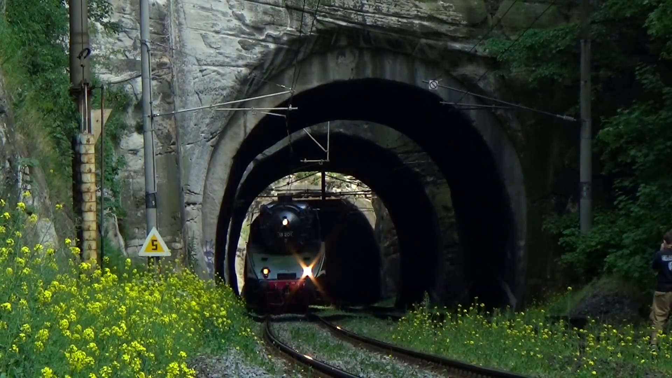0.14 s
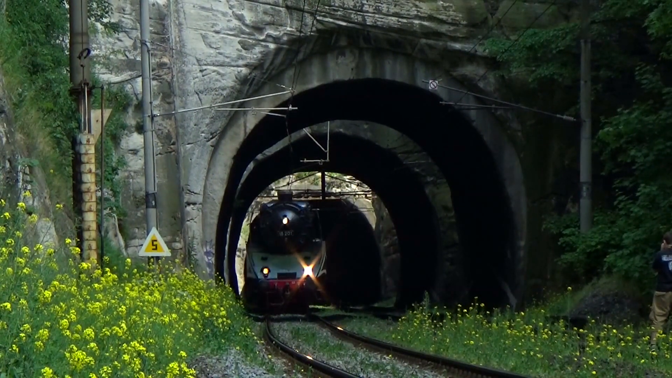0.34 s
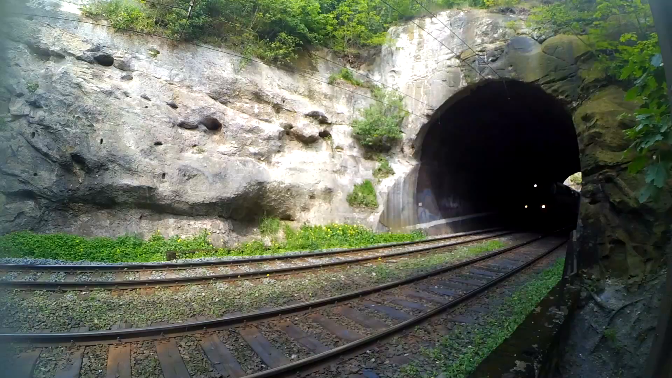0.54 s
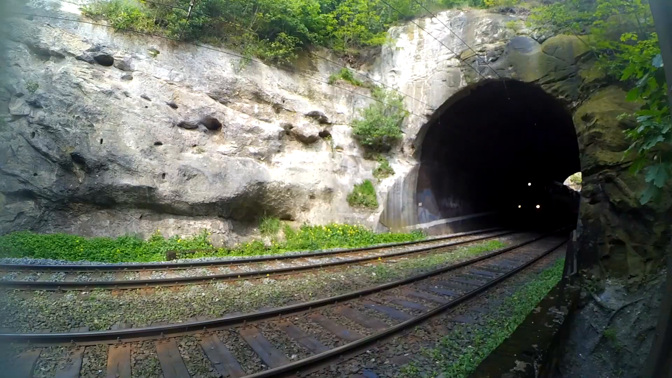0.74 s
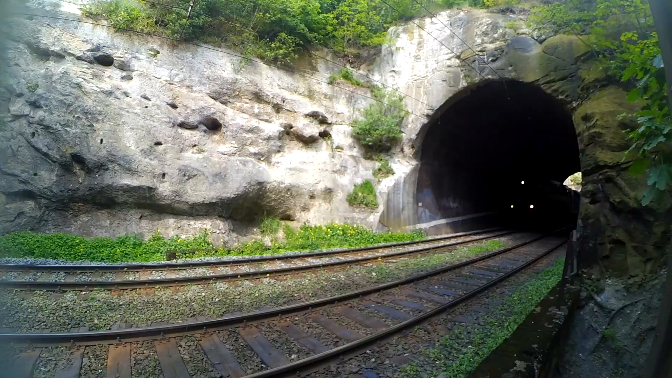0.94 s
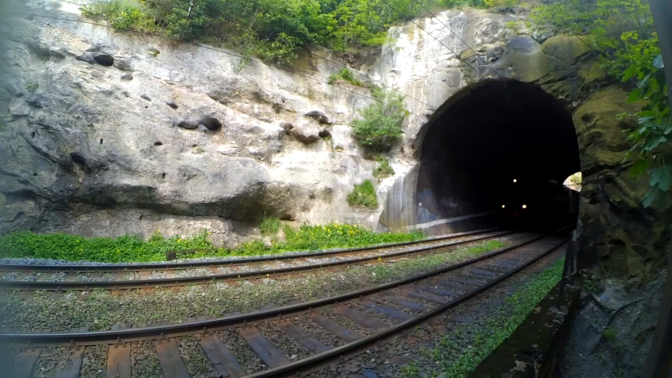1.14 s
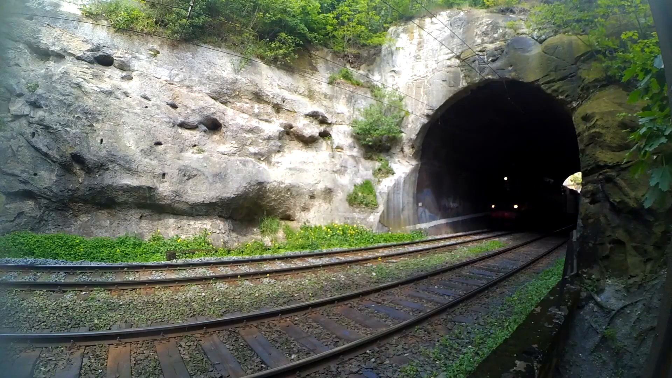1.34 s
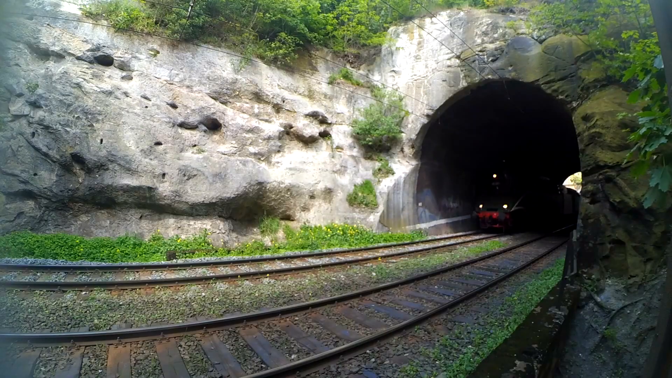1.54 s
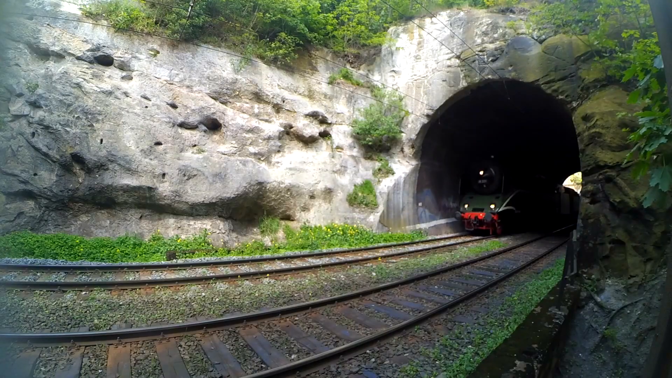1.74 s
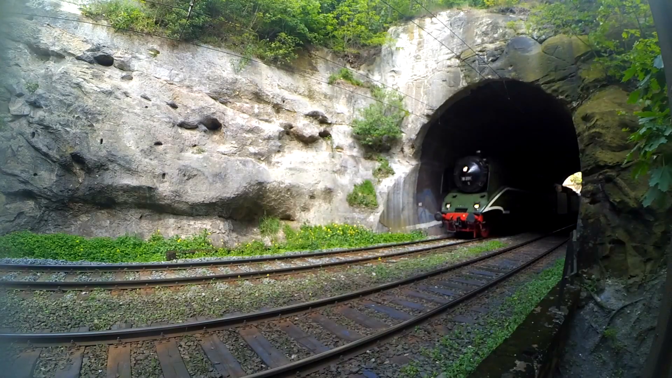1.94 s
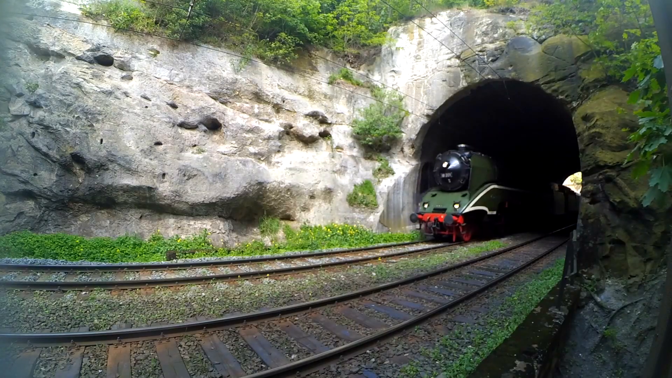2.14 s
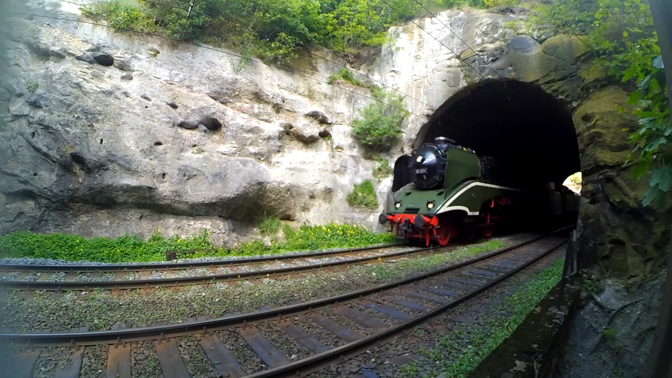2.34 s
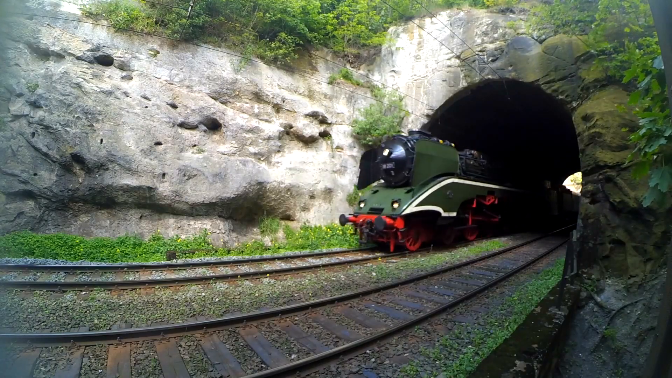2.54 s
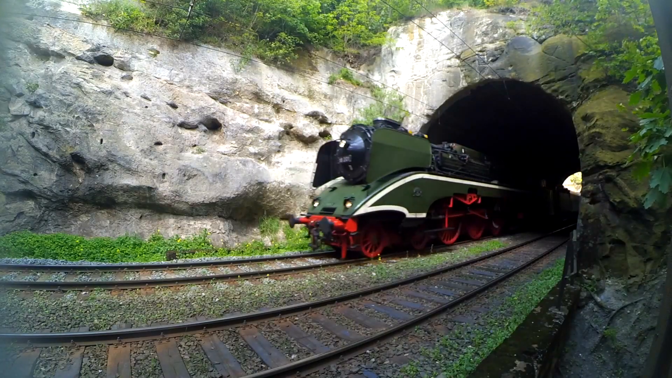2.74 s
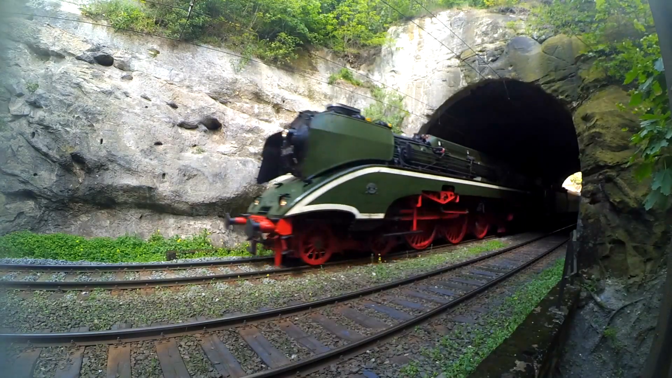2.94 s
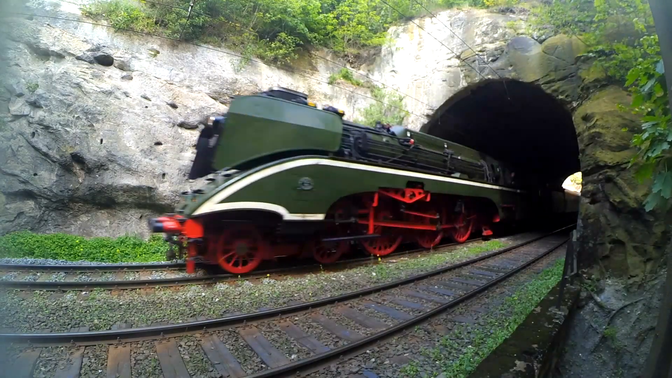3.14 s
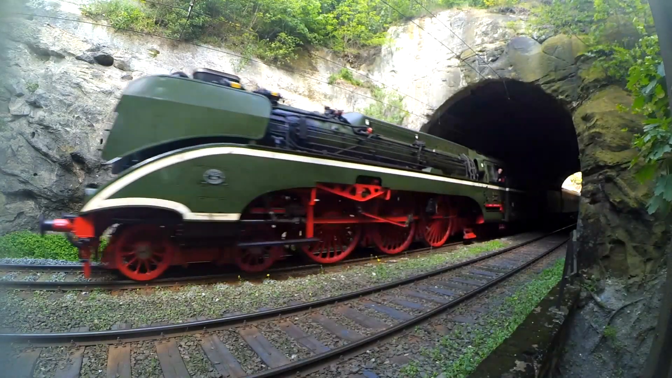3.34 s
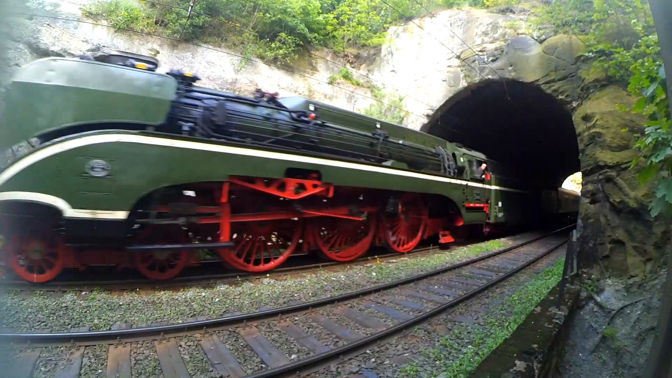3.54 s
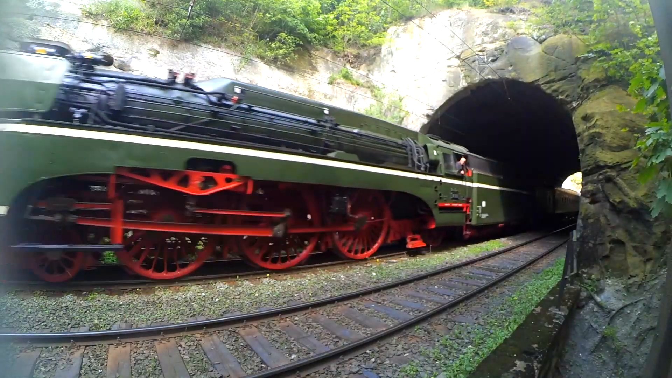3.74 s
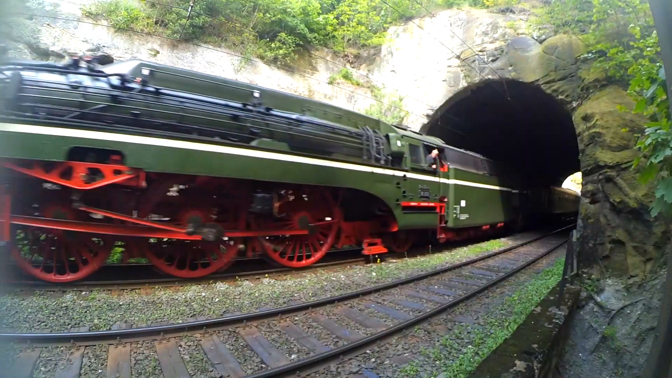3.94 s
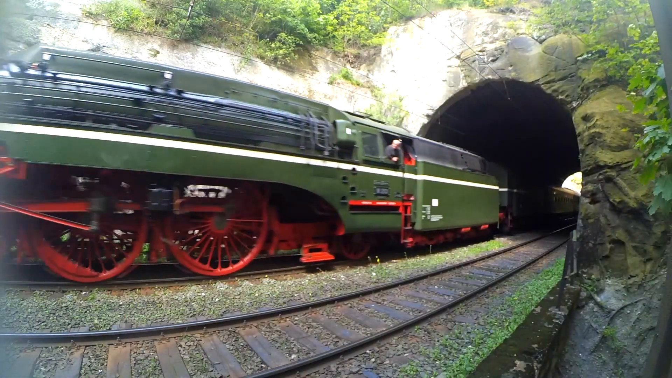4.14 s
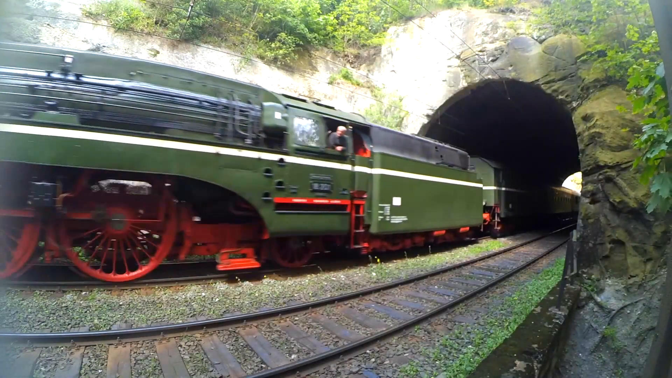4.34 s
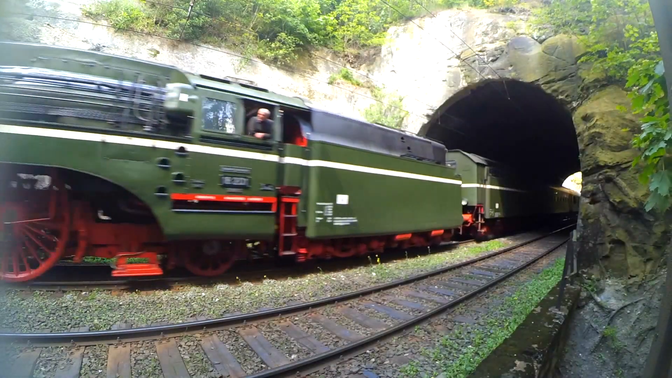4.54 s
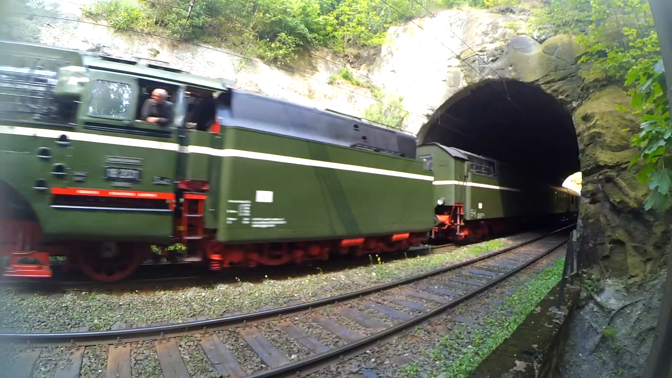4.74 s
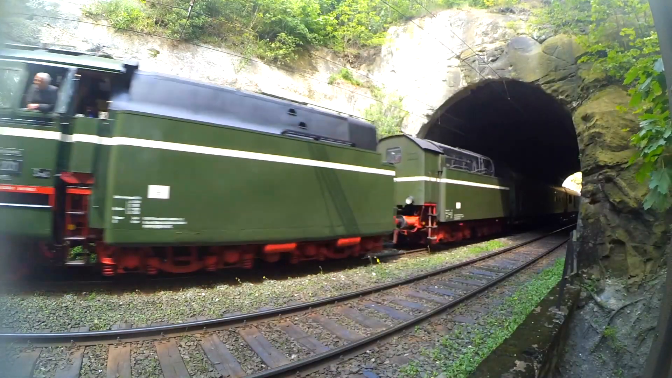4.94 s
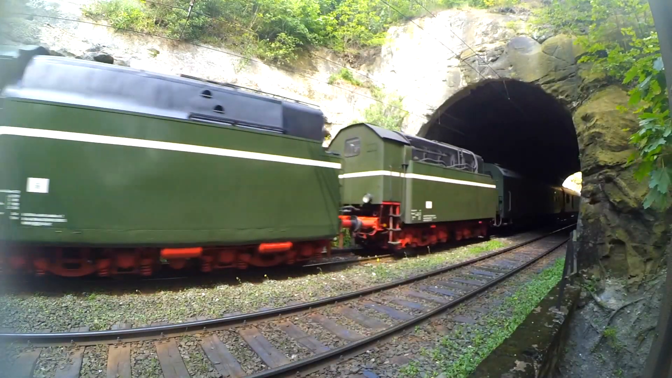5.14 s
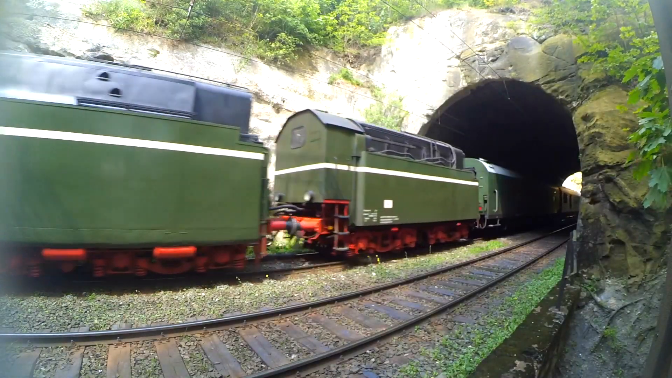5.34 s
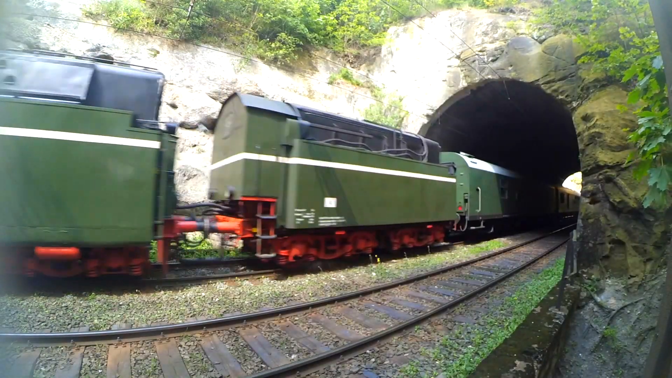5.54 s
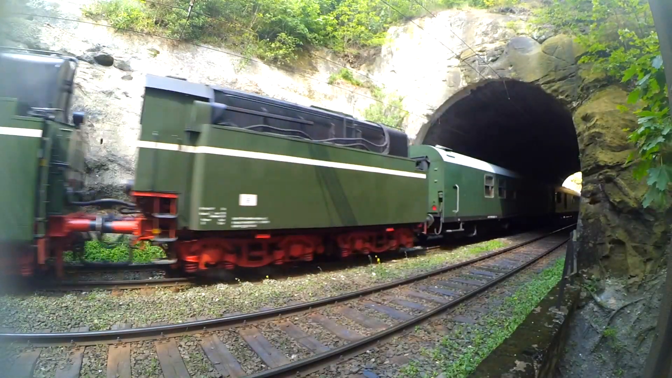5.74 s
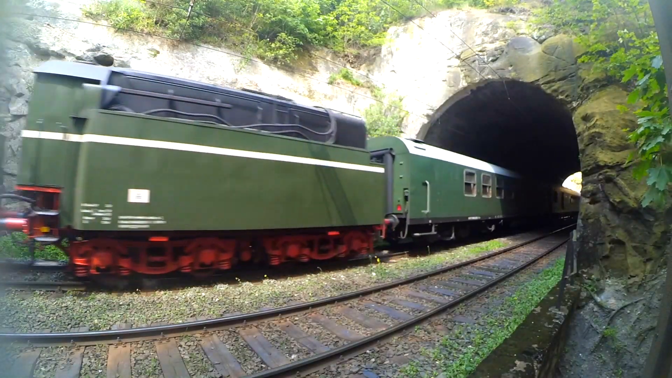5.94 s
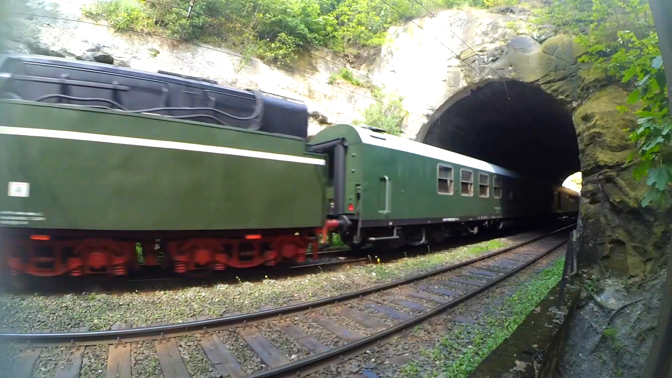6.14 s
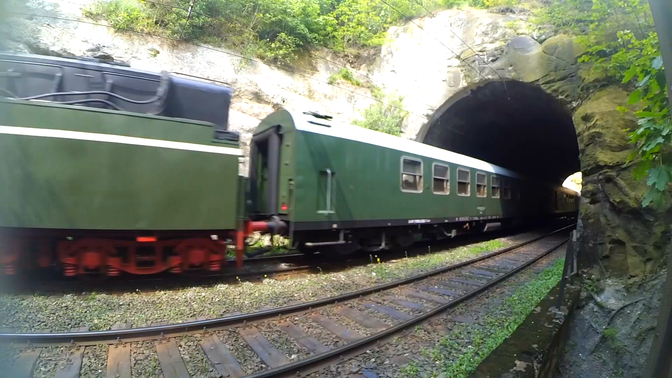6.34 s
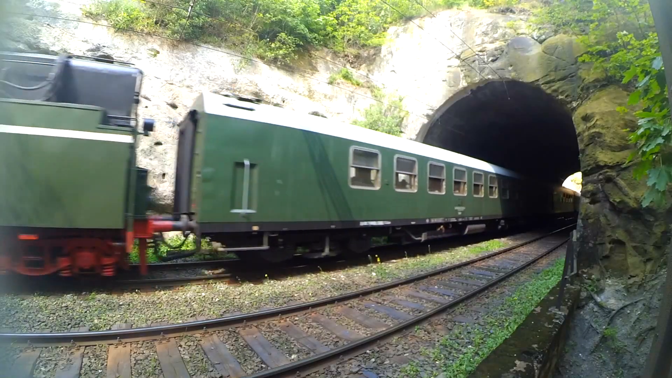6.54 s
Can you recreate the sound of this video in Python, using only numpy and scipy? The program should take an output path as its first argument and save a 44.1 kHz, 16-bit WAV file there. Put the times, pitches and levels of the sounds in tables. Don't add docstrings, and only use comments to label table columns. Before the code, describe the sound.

For the first 0.5 seconds a smooth distant train roar sits under thin, falling bird chirps. It cuts abruptly to a close trackside microphone by a rock tunnel: quieter low hum, gentle steam hiss and breathy puffs from about 0.9 to 1.7 seconds, with clear bird whistles near 0.7, 1.2 and 1.8 and a high cricket rasping about six times a second. Singing rails and rumble grow from 2 seconds. At 2.8 the engine leaves the tunnel and the bass opens into uneven deep booms. Steam bursts at 3.3 and sharply at 4.2, with a metallic ping and faint high squeaks. Loose rattling knocks begin around 3.5, return in clusters, and become a dense, hard clatter from 5.3 to 5.9, loudest near 5.6. Then knocks soften and thin while booming, wheel rumble and hiss continue to 6.6 seconds without stopping.

```python
import sys
import numpy as np
from scipy import signal
from scipy.io import wavfile
from scipy.ndimage import uniform_filter1d

SR = 44100
rng = np.random.default_rng(int(sys.argv[2]) if len(sys.argv) > 2 else 0)


def voltage_ratio(level):
    return 10 ** (np.asarray(level, float) / 20)


def generate_wav(sig):
    pcm = np.round(np.clip(np.atleast_2d(sig).T, -1, 1) * 32767).astype(np.int16)
    wavfile.write(sys.argv[1], SR, pcm)


N = 291060
T = np.arange(N) / SR
CUT_S = .475

# pitch_hz, wander_hz
AIR_MODES = [
    (52.5, 3.5),
    (78.55, .5),
    (101, 3.5),
]
# pitch_hz, width_hz, level_db
HOUSING_MODES = [(989, 18, 7.5), (1080, 40, -11), (1344, 394, 9), (1662, 550, -11), (1929, 170, 8),
                 (2330, 38, 3), (2525, 260, -9), (2703, 410, 7), (2740, 51, 2), (3820, 310, 3),
                 (3860, 61, 5), (4160, 490, 1.5), (4736, 180, 6), (5220, 350, 5.5), (5820, 580, -3.5),
                 (6800, 220, 6), (8940, 250, 2.5), (10700, 510, 2)]


def evened(x):
    return x / np.sqrt(np.mean(x ** 2) + 1e-20)


def read(points, hz):
    f, value = np.transpose(points)
    return np.interp(np.log(hz + 1), np.log(f + 1), value, left=-100, right=-100)


def bumps(modes, hz):
    return sum(db / (1 + (2 * (hz - f) / width) ** 2) for f, width, db in modes)


def slow(rate_hz):
    size = max(int(SR / rate_hz / 2), 3)
    return evened(uniform_filter1d(uniform_filter1d(rng.standard_normal(N), size), size))


def noise(spectrum, modes, band, patchy_db, flicker_db, size):
    frames, hz = 4 * N // size + 5, np.fft.rfftfreq(size, 1 / SR)
    a, b, patches = rng.standard_normal((frames, len(hz), 3)).T
    patches = uniform_filter1d(patches, size // 64, 0)
    patches = evened(uniform_filter1d(patches, 12000 // size + 2, 1))
    flicker = evened(uniform_filter1d(rng.standard_normal(frames), 6000 // size + 2))
    shape = voltage_ratio(read(spectrum, hz) + bumps(modes, hz))
    inside = (hz > band[0]) & (hz < band[1])
    share = np.sum(shape[inside] ** 2) / np.sum(shape ** 2)
    z = (a + 1j * b) * shape[:, None] * voltage_ratio(patchy_db * patches + flicker_db * flicker)
    return evened(signal.istft(z, nperseg=size, noverlap=3 * size // 4)[1][:N]) / np.sqrt(share)


def nearness():
    # time_s, level_db
    approach = [(0.48, -15), (0.75, -12.5), (1.2, -12), (1.84, -11.5), (2.3, -10), (2.7, -7.5), (3.0, -3.5),
                (3.25, -2.5), (3.36, -1.5), (3.6, 0.5), (4.4, 1), (5.2, 2), (5.8, 3.5), (6.6, 1.5)]
    return np.interp(T, *np.transpose(approach))


def surges(rows):
    return sum((voltage_ratio(db) * np.cos(np.pi * np.clip((T - s) / length, -.5, .5))) ** 2 for s, db, length in rows)


def distant_roar():
    # pitch_hz, level_db per Hz
    roar = [(15, -44.5), (25, -12), (53, -4), (152, -16), (253, -2), (848, -3.5), (2010, -9.5),
            (2420, -8.5), (3530, -18), (4740, -19.5), (6730, -25), (9040, -27), (15500, -34.5)]
    middle = noise(roar, [(50, 40, 9), (95, 30, -6)], (20, 16000), .3, .2, size=2048)
    side_modes = [(200, 400, -15), (8800, 500, 12), (7000, 6000, -3)]
    side = voltage_ratio(-27.0) * noise(roar, side_modes, (20, 16000), 3.3, .4, size=1024)
    return voltage_ratio(-51) * np.array([middle + side, middle - side])


def cricket():
    chirps = [.609, .751, .92, 1.068, 1.237, 1.4, 1.557, 1.728, 1.931, 2.144, 2.351, 2.516, 2.668, 2.927,
              2.988, 3.135, 3.262, 3.457, 3.627, 3.809, 3.955, 4.118, 4.277, 4.449, 4.585, 4.757, 4.908,
              5.091, 5.236, 5.416, 5.576, 5.735, 5.889, 6.06, 6.242, 6.451]
    chirp_s = .04
    wing = [(10500, -14), (10700, -1), (11000, 0), (11350, -4), (11600, -16)]  # pitch_hz, level_db per Hz
    rasp = noise(wing, [], (9000, 13000), 1., 1., size=512)
    levels_db = -74.5 + 1.1 * rng.standard_normal(len(chirps))
    shape = sum(voltage_ratio(db) * np.clip((chirp_s / 2 - abs(T - s)) / .008, 0, 1) for s, db in zip(chirps, levels_db))
    return shape * rasp


def birds_and_squeaks():
    # start_s, length_s, first_hz, last_hz, level_db
    bird_rows = [(0.25, 0.068, 5050, 4560, -66), (0.262, 0.05, 5450, 4750, -70),
                 (0.3, 0.045, 4600, 5000, -63.5), (0.335, 0.085, 4850, 4620, -66.5),
                 (0.42, 0.025, 4800, 4750, -67), (0.474, 0.045, 3680, 3600, -67),
                 (0.474, .07, 2700, 2900, -61), (.542, .07, 2950, 3170, -60.5), (.82, .05, 5120, 5150, -68),
                 (1.31, .05, 5060, 5120, -62), (1.91, .06, 5150, 5150, -66), (1.99, .06, 6250, 6230, -67),
                 (0.693, 0.14, 5240, 5030, -57), (1.212, .12, 5180, 5030, -56),
                 (1.786, 0.075, 5080, 5020, -58), (1.848, .065, 5020, 5060, -57.5),
                 (2.8, .11, 5200, 5180, -67), (3.04, .07, 5280, 5100, -68), (1.987, .07, 6700, 6750, -66),
                 (2.078, 0.06, 3930, 3960, -60.5)]
    # start_s, length_s, pitch_hz, level_db, unsteadiness_hz
    squeak_rows = [
        (.20, .05, 8900, -76, 500),
        (2.38, .04, 10650, -80, 60),
        (2.55, .05, 10600, -80, 60),
        (2.80, .05, 10300, -78, 200),
        (4.15, .06, 14170, -81, 60),
        (4.37, .4, 8000, -72, 120),
        (4.37, .12, 14330, -80, 50),
        (4.385, .1, 12480, -80, 50),
        (4.61, .03, 14050, -82, 150),
        (6.20, .18, 13550, -80, 250),
    ]
    whistles = []
    for i, (s, length, first_hz, last_hz, db) in enumerate(bird_rows):
        fade_db = -14 * (s > .29)
        whistles.append((s, s + length, first_hz, last_hz, db, db + fade_db, 25. if i < 6 else 15.))
    for s, length, hz, db, unsteady_hz in squeak_rows:
        whistles.append((s, s + length, hz, hz, db, db, unsteady_hz))

    out, waver = np.zeros(N), slow(98.0)
    for start, end, first_hz, last_hz, first_db, last_db, unsteady_hz in whistles:
        on = slice(round(start * SR), round(end * SR))
        hz = np.interp(T[on], [start, end], [first_hz, last_hz])
        level_db = np.interp(T[on], [start, end], [first_db, last_db]) + 4.5
        turns = np.cumsum(hz + unsteady_hz * waver[on]) / SR
        out[on] += voltage_ratio(level_db) * np.sin(2 * np.pi * turns) * signal.windows.tukey(len(turns), .6)
    t = np.arange(8000) / SR
    tail = rng.standard_normal(len(t)) * voltage_ratio(-60 * t / .4)
    return out + voltage_ratio(-6.0) * signal.oaconvolve(out, tail / np.linalg.norm(tail))[:N]


def rail():
    # pitch_hz, width_hz
    tones = [
        (264, 12),
        (995, 65),
    ]
    tone_db = [-60.5, -61]
    shares = [1.5, 0.99]
    fades_db = [-2.5, -10]
    # centre_s, level_db, length_s
    low_rows = [
        (1.243, -64, .14),
        (1.482, -61, 0.19),
        (1.88, -63, 0.31),
        (2.128, -57.5, 0.18),
        (2.58, -57.5, 0.24),
        (2.76, -56.5, 0.14),
        (2.963, -55.5, 0.83),
    ]
    # centre_s, level_db, length_s
    high_rows = [
        (2.55, -62.5, .1),
        (3.1, -62, 0.66),
        (4.178, -53, 0.036),
        (4.77, -58, .04),
        (4.84, -56, 0.044),
    ]
    out = np.zeros(N)
    for db, share, fade_db, rows, (hz, width_hz) in zip(tone_db, shares, fades_db, (low_rows, high_rows), tones):
        edges_hz = [hz - width_hz / 2, hz + width_hz / 2]
        sos = signal.butter(2, edges_hz, "bandpass", fs=SR, output="sos")
        steady_db = db + share * nearness() + fade_db * np.maximum(T - 3.97, 0) + 3.2 * slow(1.4)
        tone = evened(signal.sosfilt(sos, rng.standard_normal(N)))
        out += np.sqrt(voltage_ratio(steady_db) ** 2 + surges(rows)) * tone
    return out


def rolling():
    # pitch_hz, level_db per Hz
    wheel_colour = [(12, -41), (20, -18), (33, -14), (59, -7), (88, 0), (115, -9), (189, -24), (230, -20),
                    (260, -18.5), (387, -35), (654, -33.5), (743, -34.5), (900, -49), (1170, -68),
                    (1980, -120)]
    # pitch_hz, width_hz, level_db
    wheel_modes = [(38.4, 37, 7), (143, 11, 5), (165, 15, 8), (205, 6, 4.5), (348.4, 20, 12.5),
                   (390, 17, -3)]
    # pitch_hz, level_db per Hz
    steam_colour = [(240, -8), (400, 0.5), (749, -6.5), (1000, -7.5), (1710, -3), (1900, -3), (2550, -2.5),
                    (3850, -11), (4220, -16), (6780, -14.5), (15500, -37)]
    # pitch_hz, level_db per Hz
    mic_colour = [(7000, -14), (11000, -9), (14000, 0), (15500, -1)]
    coaches_db = -3.5 * np.maximum(T - 5.6, 0)
    wheels_db = -49 + nearness() + coaches_db
    steam_db = -52.5 + 0.54 * nearness()
    wheels = noise(wheel_colour, wheel_modes, (125, 480), 0.27, 0.38, size=4096)
    steam = noise(steam_colour, HOUSING_MODES, (1200, 9000), 0.83, 0.31, size=1024)
    hiss = noise(mic_colour, [], (12000, 15500), 1.5, 2.8, size=1024)
    return voltage_ratio(-80) * hiss + voltage_ratio(wheels_db) * wheels + voltage_ratio(steam_db) * steam


def puffs():
    # start_s, rise_s, fall_s, level_db at the peak
    blasts = [(0.874, 0.046, 0.32, -46.5), (1.135, 0.0045, 0.024, -52), (1.148, 0.098, 0.1, -47),
              (1.25, 0.12, 0.49, -64), (1.445, 0.014, 0.067, -57), (1.47, 0.064, 0.25, -58.5),
              (1.72, 0.051, 0.62, -62.5), (2.78, 0.036, 0.11, -59), (3.3, 0.047, 0.069, -52),
              (3.36, 0.056, .055, -50.5), (3.72, 0.031, 0.073, -56), (4.16, 0.011, 0.027, -52),
              (4.18, 0.019, 0.032, -43.5), (4.12, 0.12, 0.18, -53.5), (4.39, 0.033, .08, -61)]
    # pitch_hz, level_db per Hz
    near_colour = [(350, -36), (600, -8), (1690, -1.5), (2790, -3), (6660, -12), (10000, -26), (15500, -35)]
    # pitch_hz, level_db per Hz
    far_colour = [(1060, -38), (1800, -5), (2440, -7), (2680, 0.5), (2980, 2), (3800, 4.5), (4310, -4.5),
                  (5100, -2), (6830, -4.5), (15500, -44)]
    near_s = 3.6
    far = noise(far_colour, HOUSING_MODES, (2500, 9000), 1.8, 1.3, size=512)
    near = noise(near_colour, HOUSING_MODES, (2500, 9000), 1., 1., size=512)
    out = np.zeros(N)
    for s, rise, fall, db in blasts:
        corners_s = [-.01, 0, rise, rise + fall, rise + fall + 0.097]
        shape_db = np.interp(T - s, corners_s, [-40, -12.5, 0, -18.5, -40])
        out += voltage_ratio(db + shape_db) * (shape_db > -40) * (far if s < near_s else near)
    return out


def boom():
    mode_db = [-48, -48.5, -49.5]
    bends = [0, 0.28, 0]
    # centre_s, level_db, length_s
    low_rows = [(.56, -57, 0.39), (0.977, -47, 0.092), (1.25, -52.5, 1), (1.5, -47, .1),
                (1.714, -47.5, 0.078), (1.952, -52, 0.85), (2.205, -47.5, 0.52), (2.811, -32.5, 0.041),
                (3.12, -45, .15), (3.277, -36, .22), (3.48, -38.5, 0.11), (3.732, -53, 0.065),
                (4.13, -34.5, 0.32), (4.39, -35, .1), (4.602, -39, 0.14), (4.792, -35, 0.12),
                (4.988, -31, 0.11), (5.135, -37.5, 0.13), (5.46, -32, 0.089), (5.66, -33, 0.18),
                (5.846, -29, 0.047), (6.16, -29.5, 0.14), (6.35, -56, 0.43)]
    # centre_s, level_db, length_s
    middle_rows = [(.55, -52, 0.14), (.85, -54, 0.15), (1.82, -48.5, .35), (2.12, -51, 0.47),
                   (2.552, -55, 0.47), (2.85, -36, 0.17), (2.95, -36, 0.2), (3.09, -40, 0.51),
                   (3.52, -30, 0.064), (3.62, -36, 0.18), (3.66, -37, 0.09), (3.79, -31.5, 0.11),
                   (4.13, -32, 0.13), (4.33, -40, 0.11), (4.48, -40, 0.24), (4.671, -38, 0.087),
                   (4.82, -40, 0.12), (4.961, -28, 0.22), (5.35, -24.5, 0.48), (5.44, -23, 0.21),
                   (5.601, -18.5, 0.32), (5.769, -21.5, 0.2), (5.93, -31, 0.34), (6.141, -30, 0.036),
                   (6.25, -29, 0.17), (6.47, -38, 0.082)]
    # centre_s, level_db, length_s
    upper_rows = [(0.5, -65, 0.055), (1.07, -52, 0.13), (1.25, -46, 0.11), (1.5, -53, 0.33),
                  (1.95, -50, 0.46), (2.2, -44.5, 0.24), (2.45, -47.5, 0.8), (2.79, -35, 0.04),
                  (3.05, -41, 0.46), (3.42, -32, 0.15), (3.6, -32.5, 0.092), (3.691, -33.5, 0.091),
                  (3.85, -37.5, 0.085), (3.96, -34, 0.1), (4.08, -34.5, 0.086), (4.35, -29, 0.14),
                  (4.618, -32, 0.13), (4.76, -30, 0.087), (4.93, -42, 0.16), (5.14, -32, 0.22),
                  (5.6, -43, 0.25), (5.89, -33, 0.11), (6.09, -31, 0.35), (6.17, -32, 0.055),
                  (6.36, -31.5, 0.17), (6.55, -33, 0.34)]
    exit_s, exit_db, bend_lag_turns = 2.77, 4.5, 0.11
    steady_db = 0.9 * nearness() + exit_db * np.clip((T - exit_s) / .03, 0, 1)
    out = np.zeros(N)
    for db, bend, rows, (hz, wander_hz) in zip(mode_db, bends, (low_rows, middle_rows, upper_rows), AIR_MODES):
        turns = np.cumsum(hz + wander_hz * slow(7.32)) / SR
        turns = turns - turns[round(5.5849 * SR)]
        power = voltage_ratio(db + steady_db - slow(13)) ** 2 + surges(rows)
        swing = np.sqrt(2 * power) * np.cos(2 * np.pi * turns)
        octave = bend * power * np.cos(2 * np.pi * 2 * (turns - bend_lag_turns))
        out -= swing + octave
    return out


def knocking():
    # start_s, level_db of first knock, low_modes_db over that, fading_db a knock
    bursts = [(3.492, -40, -8, 4), (3.601, -42, 1, 4.5), (3.66, -48, 6.5, 11), (3.737, -45.5, -7, -1.5),
              (3.79, -50, 2, 11), (3.857, -38, -6, 4), (4.149, -46, 1, 0.5), (4.631, -46.5, 4, 6),
              (4.697, -53, 9, 2), (4.76, -37.5, -4, -1), (4.785, -41, -7, 9), (4.913, -47, 10, 9),
              (4.961, -25, -3, 12), (5.037, -39, 3, 11), (5.25, -33.5, 3, 5), (5.3141, -30, -1, 10),
              (5.3402, -27.5, 0.5, 4), (5.378, -32.5, 1, 0), (5.3902, -25.5, -2, 7), (5.4164, -33, 2, 0),
              (5.4287, -30, 0, 0), (5.441, -26.5, -1, 5.5), (5.479, -29.5, 0, 6), (5.5042, -32.5, 1, 7),
              (5.5305, -22.5, -2, 3.5), (5.5807, -21.5, -3, 6), (5.6064, -23.5, -1.5, -.5),
              (5.6436, -31.5, 2, 0), (5.658, -25.5, -1, -1.5), (5.6949, -30.5, 1, 5),
              (5.7215, -20.5, -4, 9), (5.76, -25.5, -2, 6), (5.7863, -32, 1, 0), (5.7978, -27, -2, 7),
              (5.8498, -31.5, 1, 8), (5.875, -35, -1, 13), (5.913, -29.5, -0.5, 14), (5.947, -35.5, -4, 11),
              (5.989, -30.5, -4, 4.5), (6.045, -49, -3, 1), (6.139, -37, -1, 0), (6.15, -36.5, -3, 5),
              (6.19, -34.5, 0.5, 6), (6.254, -43, 7, 0), (6.266, -37, -8, 5), (6.29, -36, -4, 3),
              (6.33, -41.5, 5, 2), (6.343, -35, -9, 6), (6.464, -38, -4, 11), (6.51, -44.5, 6, 5),
              (6.56, -41.5, -9, 1)]
    # pitch_hz, level_db, t60_s
    part_modes = [(250, -7, 0.1), (261.5, -9.5, 0.19), (317, 1.5, 0.13), (339, 3, 0.12), (396, -4.5, 0.11),
                  (413, -5, 0.15), (544, 5.5, 0.044), (723, 2.5, 0.085), (783, -5, 0.052),
                  (897, -16, 0.026), (922, -8.5, 0.059), (1000, -5, 0.063), (1085, -19, .04),
                  (1380, -10, 0.055), (1544, -6.5, 0.038)]
    s, db, low_db, fade_db = np.array(bursts).T
    period, cycle = 1 / AIR_MODES[1][0], np.arange(6)
    hurry_s = .00022
    uneven, late = rng.standard_normal((len(s), len(cycle), 2)).T
    at = s[:, None] + cycle * (period - hurry_s) - .0022 + .0001 * late.T * (cycle > 0)
    strike_db = db[:, None] - np.clip(fade_db, -2, 12)[:, None] * cycle + uneven.T * (cycle > 0)
    kept = at < np.append(s[1:], N / SR)[:, None] - .008
    dull_db = 1.2 * np.minimum(strike_db + 27.5, 0)
    low_at = at + cycle * hurry_s - .0002
    upper_at = at - .0018

    t, out = np.arange(9000) / SR, np.zeros(N)
    # lowest_hz, highest_hz, passed band in Hz
    groups = ((180, 430, [180, 430]), (525, 780, [525, 1070]),
              (780, 1130, [525, 1110]), (1350, 1650, [1350, 1650]))
    for lo, hi, band in groups:
        low, top = hi < 500, lo > 700
        group_at = low_at if low else upper_at
        group_db = strike_db + low * (low_db[:, None] - 0.4 + 0.2 * cycle) + top * dull_db
        strikes = np.zeros(N)
        strikes[(group_at[kept] * SR).astype(int)] = voltage_ratio(group_db)[kept]
        graze = voltage_ratio(-12.0) * np.roll(strikes, -round(0.00341 * SR)) * (not low)
        bounce = voltage_ratio(-7.0 - 2.1 * low) * np.roll(strikes, round(0.00497 * SR))
        strikes = strikes + graze + bounce
        ring = sum(voltage_ratio(d - 60 * t / t60) * np.sin(2 * np.pi * hz * np.maximum(t - hz * 3e-6, 0))
                   for hz, d, t60 in part_modes if lo < hz < hi)
        ring = signal.sosfilt(signal.butter(3, band, "bandpass", fs=SR, output="sos"), ring)
        out += (1 if low else -1) * signal.oaconvolve(strikes, ring)[:N]
    return voltage_ratio(-12.5) * out


def patchy_treble(x):
    hz, _, z = signal.stft(x, SR, nperseg=1024, noverlap=768)
    chance = rng.random((z.shape[1] // 7 + 1, len(hz) // 2 + 1)).T.repeat(2, 0).repeat(7, 1)
    chance = chance[:len(hz), :z.shape[1]]
    odds = np.interp(hz, [12300, 12800, 14700, 15000, 15400], [0, .3, .35, .8, 1])
    level = uniform_filter1d(uniform_filter1d(abs(z), size=9, axis=0), size=7, axis=1)
    loud = level > voltage_ratio(5.) * np.median(level, axis=1)[:, None]
    spared = loud & (hz < 15000)[:, None]
    kept = (chance > odds[:, None]) | spared
    return signal.istft(z * kept, SR, nperseg=1024, noverlap=768)[1][:N]


def scene():
    second = np.clip((T - CUT_S) / 0.0018, 0, 1)
    low = boom()
    near = low + patchy_treble(rolling() + rail() + puffs() + knocking() + cricket())
    shake = voltage_ratio(-58.5) * slow(25.) * np.clip((T - 2.7) / 0.089, .15, 1)
    near = near + np.array([[1], [-1]]) * (voltage_ratio(-64.0) * np.roll(low, 150) + shake)
    return (1 - second) * distant_roar() + second * near + birds_and_squeaks()


def low_pass(x):
    return signal.sosfilt(signal.butter(12, 15640, fs=SR, output="sos"), x)


def record(dry):
    offset = [
        [.001],
        [-.0028],
    ]
    onset = np.sin(np.pi / 2 * np.clip((T - CUT_S) / 0.0025, 0, 1)) ** 2
    return low_pass(dry + np.array(offset) * onset)


dry = scene()
out = record(dry)
generate_wav(out)
```